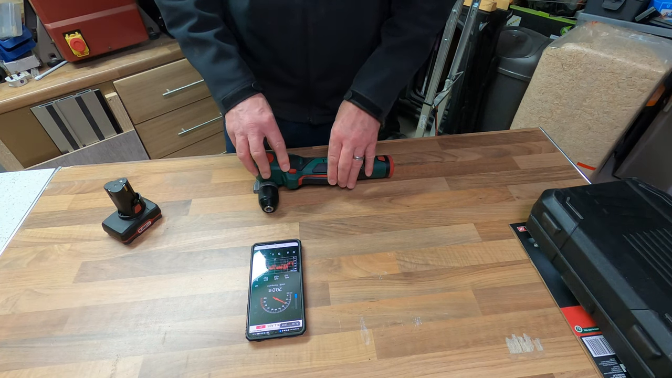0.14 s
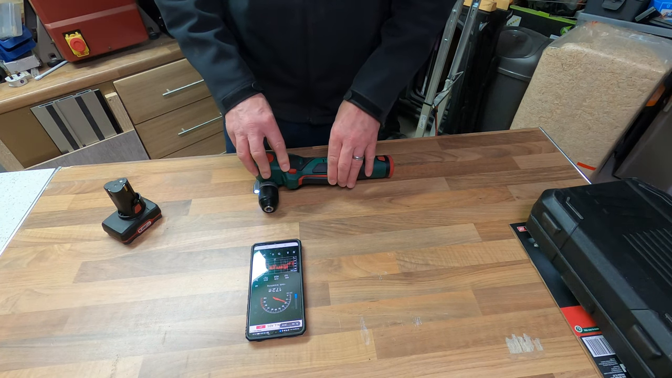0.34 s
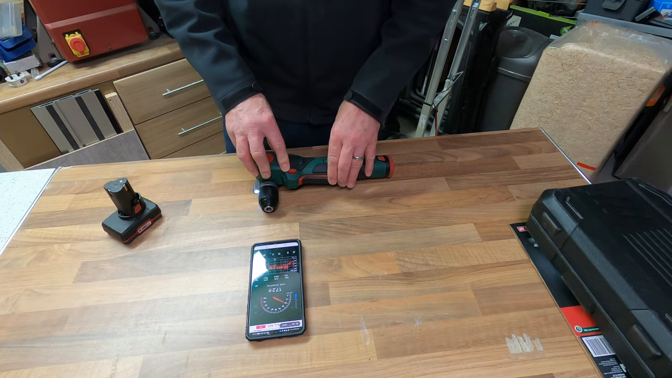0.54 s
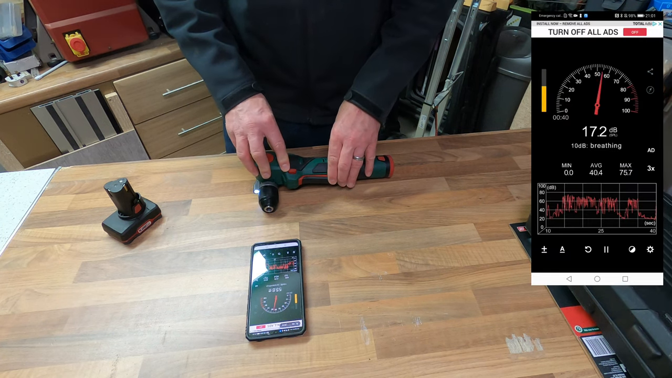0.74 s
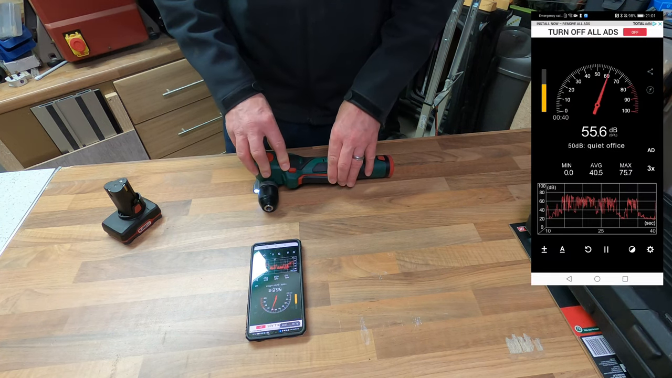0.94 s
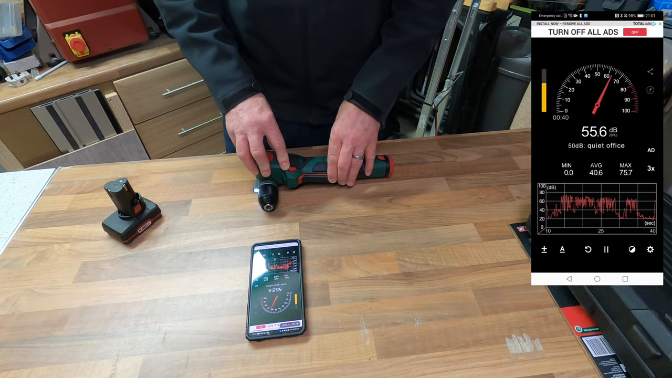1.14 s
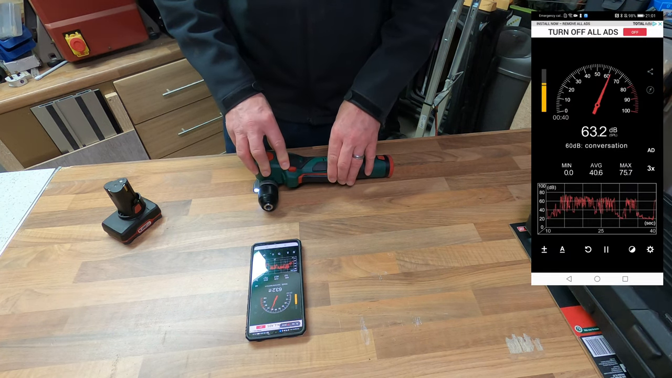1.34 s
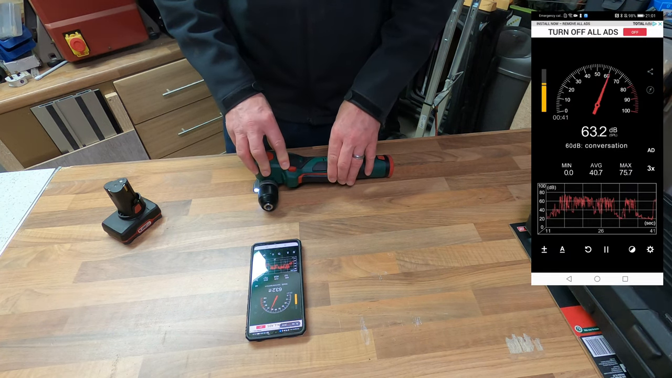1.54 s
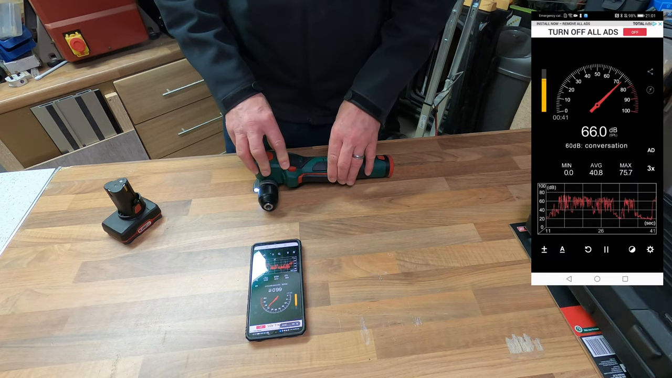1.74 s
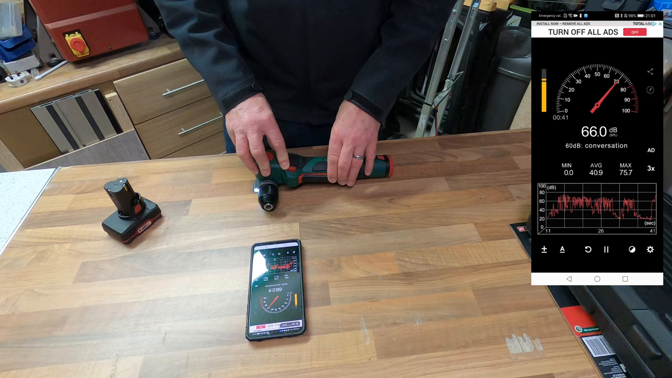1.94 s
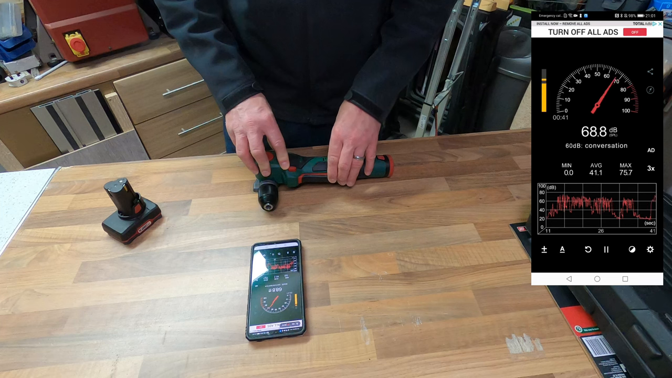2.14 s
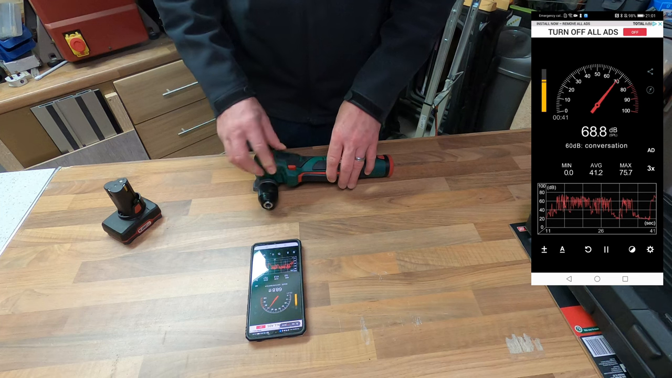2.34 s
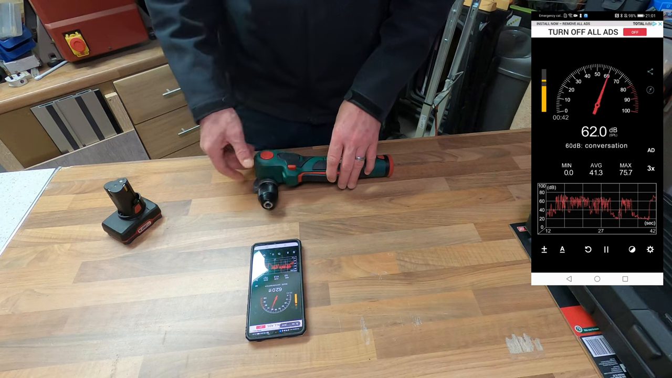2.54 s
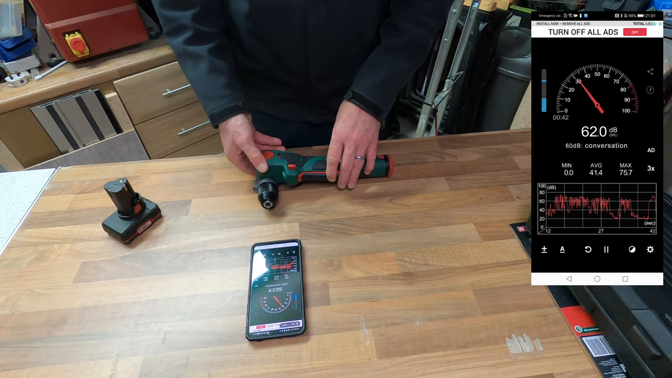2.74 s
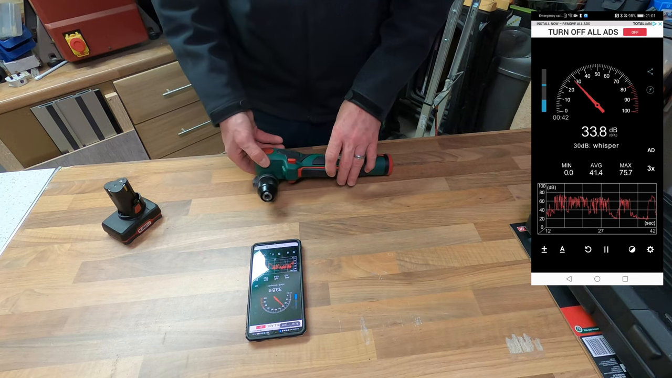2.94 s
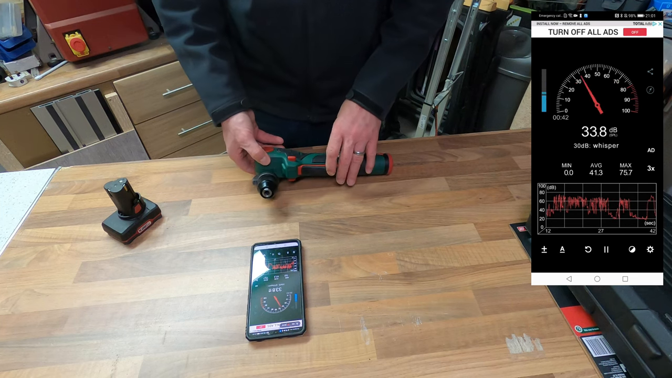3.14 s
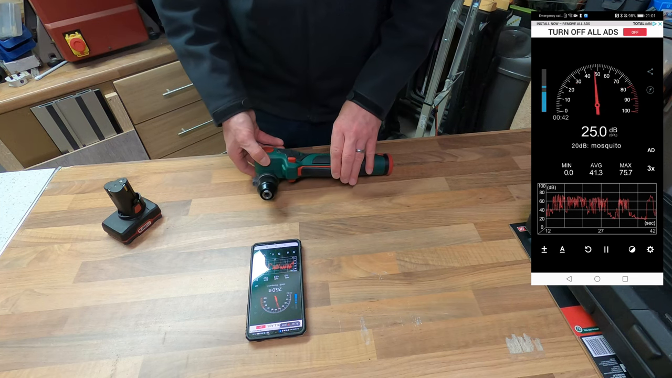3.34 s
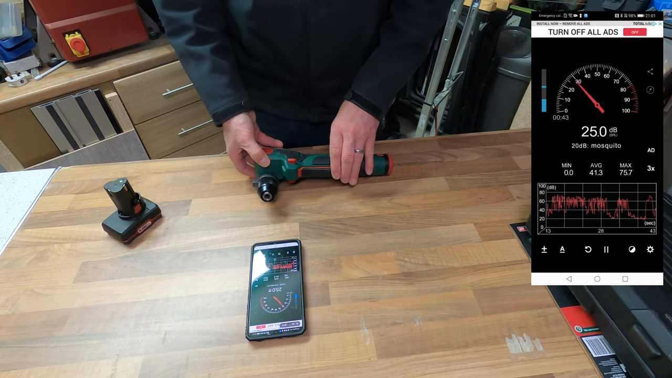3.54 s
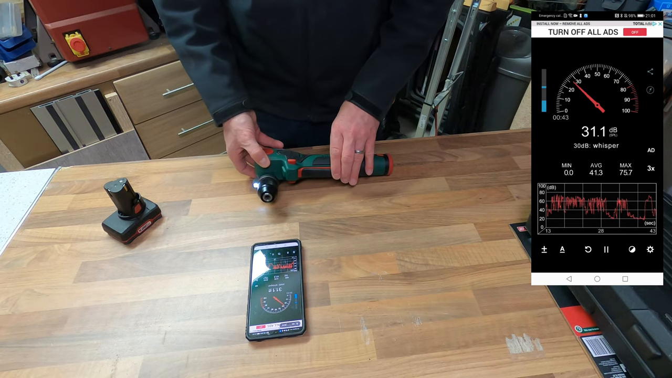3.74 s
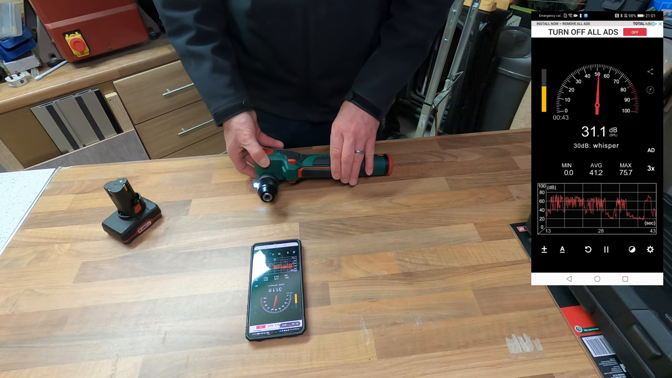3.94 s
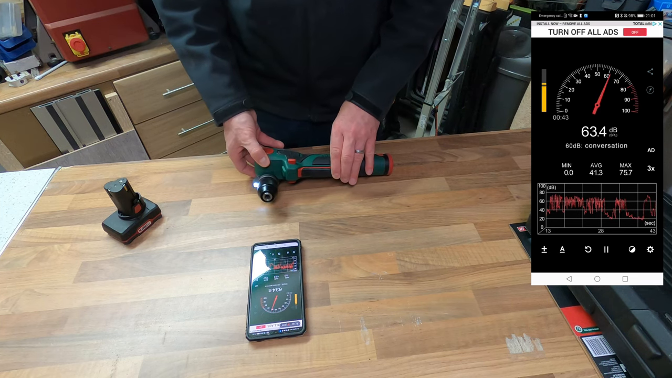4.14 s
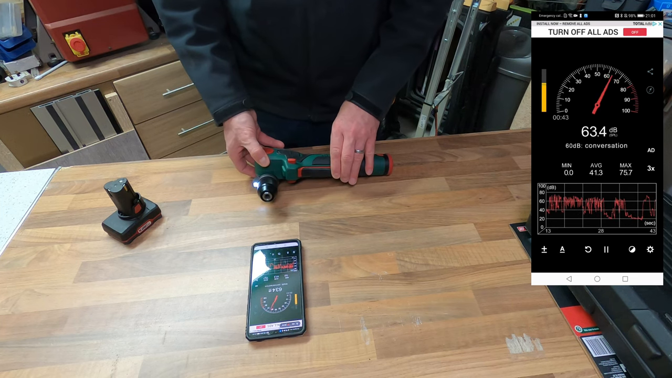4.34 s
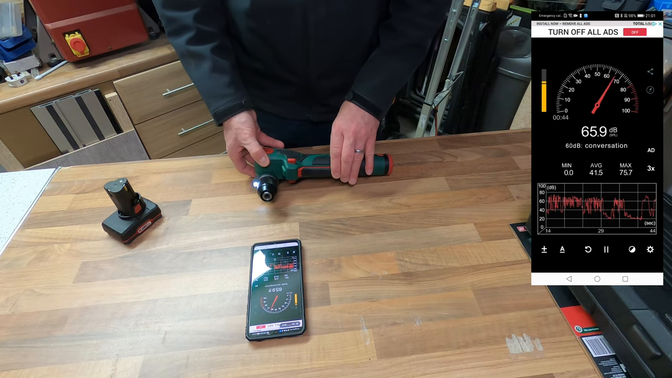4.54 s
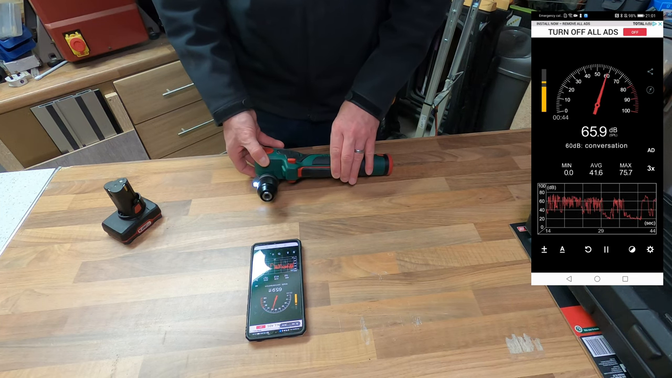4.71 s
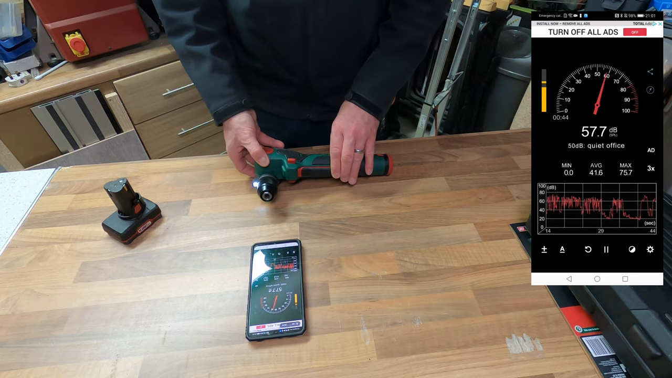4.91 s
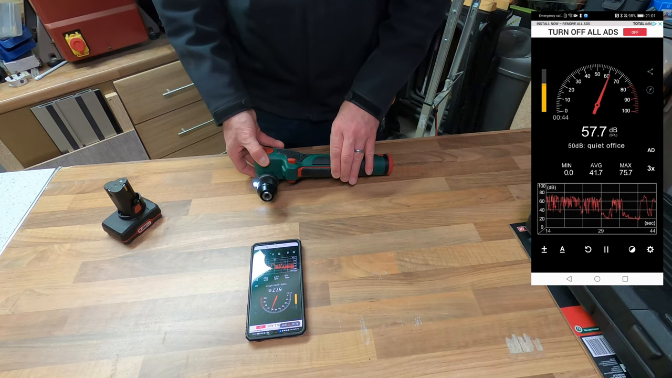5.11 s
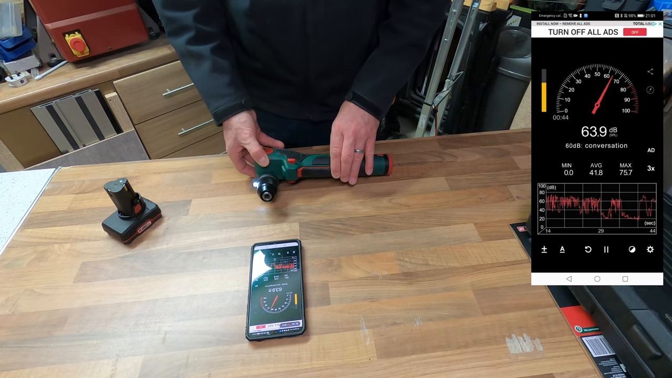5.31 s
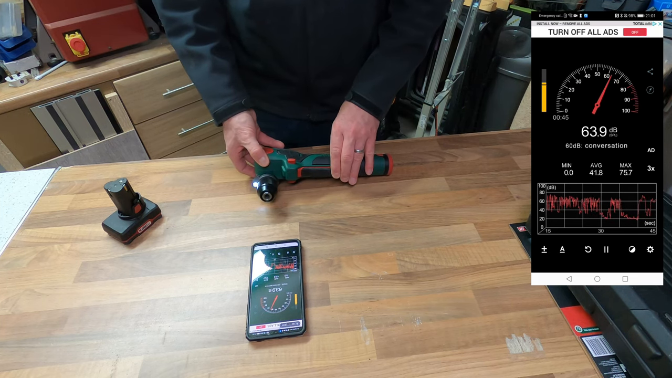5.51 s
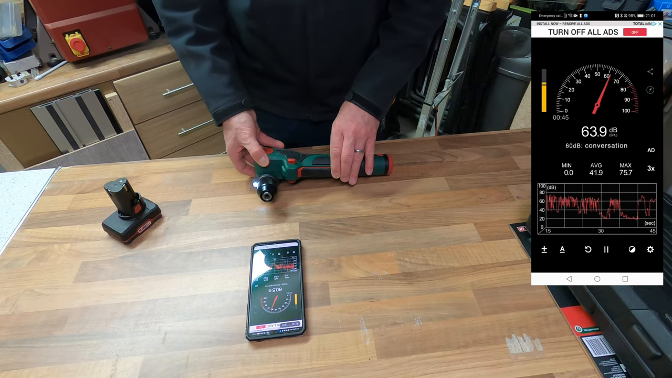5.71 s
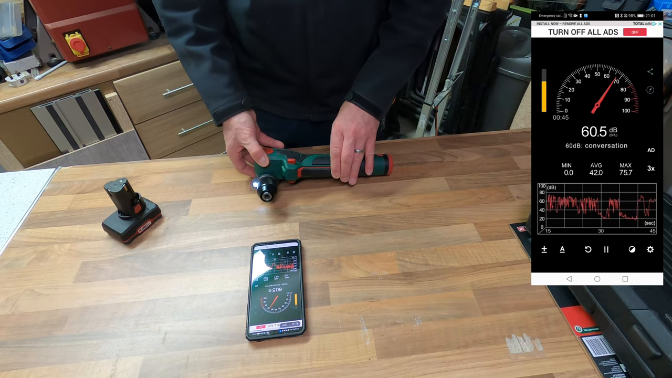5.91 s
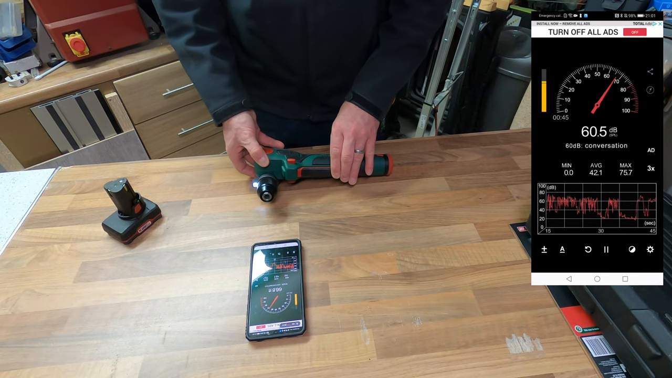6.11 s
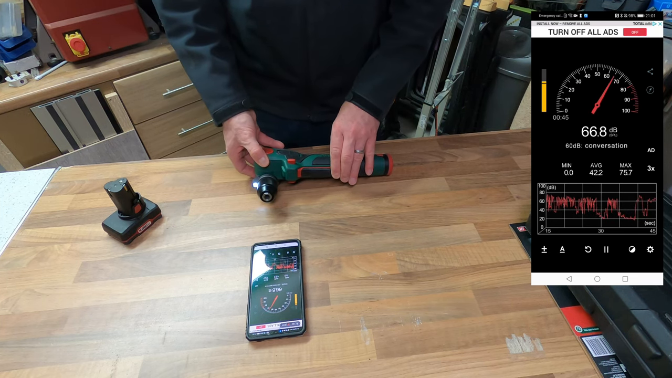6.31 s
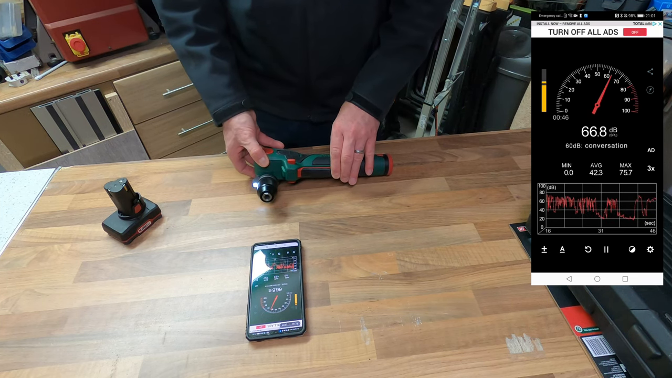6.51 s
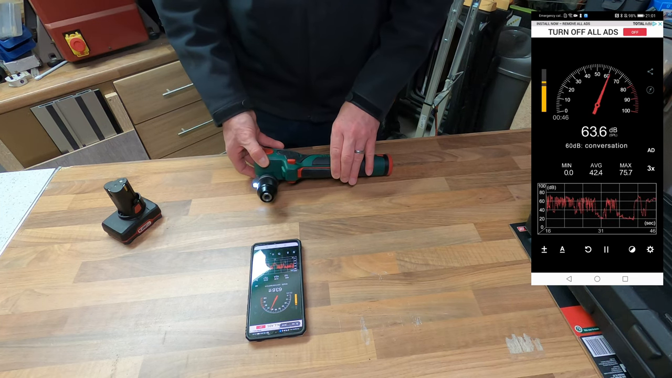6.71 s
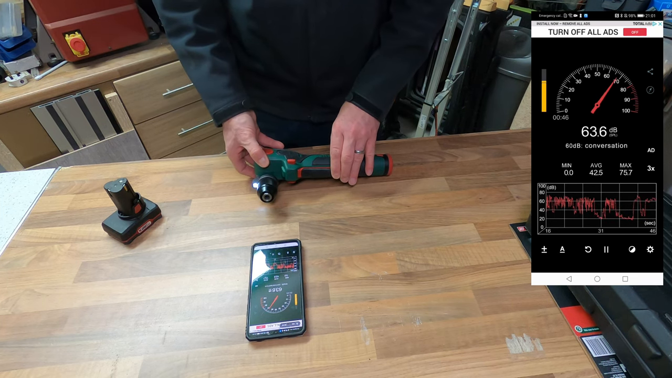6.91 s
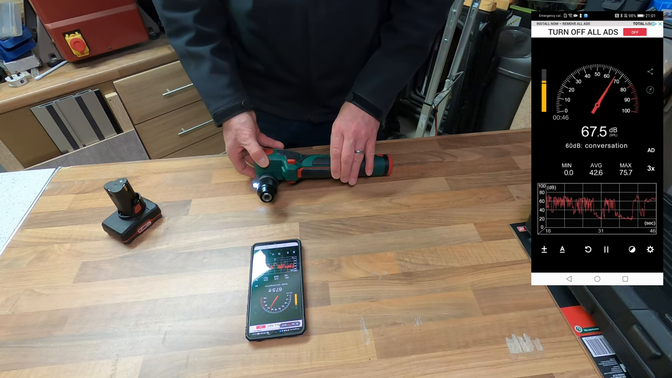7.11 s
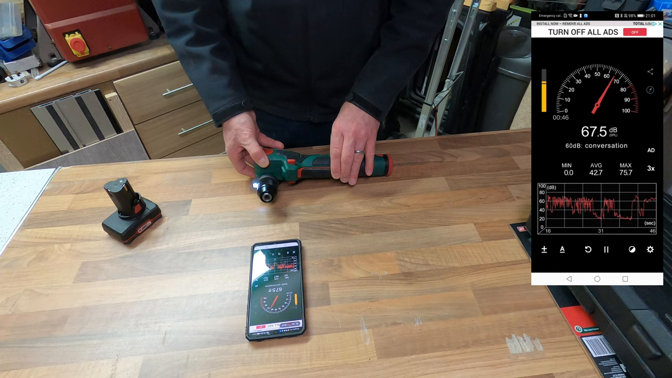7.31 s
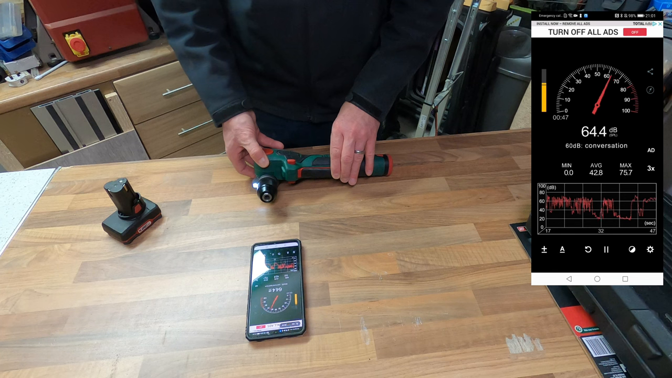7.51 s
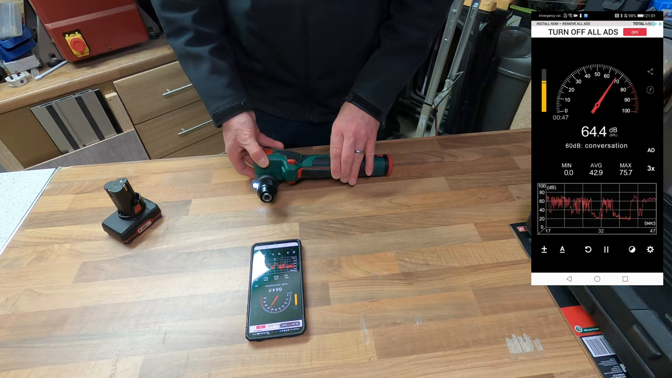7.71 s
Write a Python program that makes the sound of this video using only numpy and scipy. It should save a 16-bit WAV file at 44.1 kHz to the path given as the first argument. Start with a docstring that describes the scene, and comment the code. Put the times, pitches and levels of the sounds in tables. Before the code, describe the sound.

Unloaded right-angle drill on a wooden bench: whistling crawl, brief rev and brake, grip thumps, then a fast spin-up to bright, rasping full speed.

```python
"""A faint workshop murmur and a small knock come first, then a cordless angle drill runs unloaded on a wooden bench:
one short burst, a few thumps and rubs as the hand shifts its grip, then a wind-up to full speed.
One shaft speed drives it all: the motor sings on multiples of it, the gears turn noise into rattle,
and the bench booms as low tones sweep through its resonances. A speed controller whistles at part trigger."""
import sys
import numpy as np
from scipy import signal
from scipy.fft import rfft, irfft, next_fast_len
from scipy.io import wavfile
from scipy.ndimage import uniform_filter1d

SR = 44100
rng = np.random.default_rng(int(sys.argv[2]) if len(sys.argv) > 2 else 0)


def master_out(mix):
    """Clip the mix to full scale and print it as 16-bit PCM to the path in sys.argv[1]."""
    frames = np.transpose(np.atleast_2d(mix))
    ceiling = np.clip(frames, -1, 1)
    pcm = np.round(ceiling * 32767).astype(np.int16)
    wavfile.write(sys.argv[1], SR, pcm)


N = 342216
TIME = np.arange(N) / SR
SIZE = 2 * next_fast_len((N + SR) // 2)  # leaves room for ringing to die out
FREQS = np.fft.rfftfreq(SIZE, 1 / SR)
CRAWL_TURNS_PER_S = 66  # below about this speed the rotor turns lumpily
CHUCK_ORDER, PLANET_ORDER = .0521, .2607  # turns per turn of the motor shaft


def amp(db):
    """Decibels to gain."""
    return 10 ** (np.asarray(db) / 20)


def unit(x):
    """Scales to rms 1."""
    return x / np.sqrt(np.mean(x ** 2) + 1e-20)


def lookup(points, hz):
    """Reads a two-column table along a logarithmic axis."""
    position, value = np.transpose(points)
    return np.interp(np.log(hz + 1), np.log(position + 1), value)


def shaped(x, gain):
    """Filters by a gain at each frequency."""
    return irfft(rfft(x, SIZE) * gain, SIZE)[..., :N]


def drift(hz):
    """Smooth random wander of rms about 1, mostly slower than hz."""
    coarse = np.linspace(0, TIME[-1], next_fast_len(N // 16))
    gain = 1 / (1 + (np.fft.rfftfreq(len(coarse), coarse[1]) / hz) ** 4)
    wander = irfft(rfft(rng.standard_normal(len(coarse))) * gain, len(coarse))
    return np.interp(TIME, coarse, unit(wander))


# How alike noise is at the two microphones. Each row: frequency in Hz, likeness from 0 to 1.
LIKENESS = [(30, .8), (100, .98), (400, .97), (700, .95), (2500, .9), (12000, .6)]


def noise(db, strength=0.57):
    """Noise of rms 1 times strength, coloured by a relative spectrum in dB, partly alike at the two microphones."""
    like = np.clip(lookup(LIKENESS, FREQS), 0, 1)
    split = np.sqrt(np.array([1 + like, 1 - like]) / 2)
    mid, side = shaped(strength * rng.standard_normal((2, N)), unit(amp(db)) * split)
    return np.array([mid + side, mid - side])


def tone(turns, order, flutter, spread=0.):
    """One multiple of the shaft rotation; it wavers, and reaches the microphones by different paths."""
    waver = 1 + flutter * (drift(12) + 1j * drift(12)) / np.sqrt(2)
    paths = np.exp(1j * spread * np.array([[1], [-1]]) * drift(0.74))
    rotation = np.exp(2j * np.pi * (order * turns + rng.random()))
    return np.sqrt(2) * (paths * waver * rotation).real


def blow(s, rise, decay):
    """Envelope that swells exponentially up to a moment and dies away exponentially after it."""
    return np.exp(-np.maximum((s - TIME) / rise, (TIME - s) / decay).clip(0, 60))


# Workshop background colour. Each row: frequency in Hz, relative density in dB per Hz.
AIR = [(25, -3), (50, -10), (90, -34.5), (160, 2.5), (300, -11.5), (550, -18), (1200, -16), (8000, -33.5),
       (15000, -47)]
AIR_DB = -62.5  # gain on the noise


def air():
    """The workshop background is steady noise, heaviest in the low tones."""
    return amp(AIR_DB) * noise(lookup(AIR, FREQS))


def workshop(x, wet_db=-10, t60=0.13, apart=0.53):
    """A short scatter of reflections from bench, cupboards and walls, partly the same at both microphones."""
    sparse = rng.standard_normal((3, N)) * (rng.random((3, N)) < 2500 / SR)  # 2500 a second on average
    taps = sparse * amp(-60 * TIME / t60) * (TIME > .002)
    taps = taps[0] + apart * taps[1:]  # one shared scatter plus one for each side
    soak = FREQS ** 2 / (FREQS ** 2 + 500 ** 2)  # clutter soaks up the low reflections
    return x + amp(wet_db) * shaped(x, soak * rfft(taps / np.linalg.norm(taps[0]), SIZE))


# Sharp resonances of bench and tool. Each row: frequency in Hz, gain at the peak in dB.
RINGS = [(190, 5.5), (245, 6.5), (295, 2.5), (405, 7), (905, 8.5)]
RING_WIDTH = 0.042  # share of each frequency


def ringing(x):
    """Sharp resonances of bench and tool store what passes and ring on, beating against tones that glide away."""
    boost = sum((amp(db) - 1) / (1 + 2j * (FREQS / hz - 1) / RING_WIDTH) for hz, db in RINGS)
    return shaped(x, 1 + boost)


# How the bench top radiates. Each row: frequency in Hz, relative level in dB.
BENCH = [(30, -39), (70, -24), (100, -14.5), (135, -4.5), (190, -2), (300, 2), (410, -4.5), (500, -8.5),
         (700, -16.5), (1500, -29), (5000, -66)]
# Gear case colour at part speed. Each row: frequency in Hz, relative density in dB per Hz.
CASE_SLOW = [(320, -20), (550, -9.5), (705, -10), (880, -11.5), (1130, -9.5), (1520, -4), (2200, -8.5),
             (2700, -5.5), (3100, -8), (3610, -1), (4440, -12), (6100, -15.5), (7510, -27), (8870, -22.5),
             (15000, -47)]
# The tool thuds on the bench. Each row: peak in seconds, relative level in dB, decay to 1/e in seconds.
THUDS = [(.333, -53, 0.017), (2.456, -29, 0.018), (2.53, -43, 0.095), (2.69, -49.5, 0.032),
         (2.745, -52, 0.01), (3.035, -55, 0.03), (3.213, -34.5, 0.037), (3.375, -56, 0.072),
         (3.831, -30, 0.012)]
# Slack gears and plastic click in the housing. Each row: peak in seconds, relative level in dB.
CLICKS = [(0.334, -53.5), (.545, -40), (.555, -37), (.564, -36.5), (.588, -37), (2.513, -38), (3.745, -51),
          (3.777, -49), (3.802, -37), (3.83, -31)]
# Soft noise swells: hand and sleeve rubs, and the short dull body of the first knock and the trigger click.
# Each row: centre in seconds, half length in seconds, relative level in dB, lower edge in Hz, upper edge in Hz.
SOFT_SWELLS = [(0.852, 0.068, -35.5, 400, 1820), (2.563, 0.15, -56.5, 600, 4200),
               (2.85, 0.088, -57, 1500, 3800), (3.222, 0.045, -62, 500, 2500),
               (3.803, 0.018, -49, 750, 950), (0.335, 0.008, -55, 400, 1300)]
THUD_RISE_SHARE, CLICK_RISE_S, CLICK_DECAY_S = 0.4, 0.00061, 0.0023


def thuds():
    """Each thud is a swell of noise coloured by the bench top, which then rings on."""
    envelope = sum(amp(db) * blow(s, THUD_RISE_SHARE * decay, decay) for s, db, decay in THUDS)
    # the rubber grip takes the edge off each blow
    soft_db = -20 * np.log10(1 + (FREQS / 310) ** 6 + (155 / (FREQS + 1)) ** 4)
    return ringing(envelope * noise(lookup(BENCH, FREQS) + soft_db))


def handling():
    """Thuds and clicks are sharp bursts of noise; rubs and the dull bodies of two knocks are rounded swells."""
    click = sum(amp(db) * blow(s, CLICK_RISE_S, CLICK_DECAY_S) for s, db in CLICKS)
    blunt_db = -20 * np.log10(1 + (FREQS / 7200) ** 4)  # skin, cloth and plastic make little top treble
    swells = np.zeros((2, N))
    for s, half, db, low_hz, high_hz in SOFT_SWELLS:
        colour = -10 * np.log10((1 + (FREQS / high_hz) ** 4) * (1 + (low_hz / (FREQS + 1)) ** 3))
        swells += amp(db) * np.exp(-((TIME - s) / half) ** 2) * noise(colour + blunt_db)
    return swells + thuds() + click * noise(lookup(CASE_SLOW, FREQS) + blunt_db)


# Moves of the trigger; an aim below zero is the brake dragging the rotor to a halt.
# Each row: start in seconds, speed aimed at in turns a second, settling time in seconds.
TRIGGER = [(.508, 20.8, .128), (.9, 25.3, .085), (1.272, 28, .1), (1.338, 90, .125), (1.44, 138.4, .094),
           (1.6, 154.7, .2), (2.12, 120, .2), (2.168, -145, .6), (2.48, 0, .02), (3.799, 22, .09),
           (3.875, 31.3, .115), (4.25, 85, .125), (4.345, 205.5, .101), (4.547, 223, .175),
           (4.885, 250, .12), (4.945, 358.4, .057), (6.05, 360.9, .2)]


def shaft():
    """Turns a second: after each move of the trigger the rotor closes in exponentially on its new speed."""
    speed = np.zeros(N)
    for s, aim, settle in TRIGGER:
        at = round(s * SR)
        approach = np.exp(-TIME[:N - at] / settle)
        speed[at:] = np.maximum(aim + (speed[at] - aim) * approach, 0)
    return speed


# Bench resonances under the rotor's pull. Each row: frequency in Hz, width in Hz, peak level in dB.
BOOMS = [(197, 69, -29), (308.7, 79, -23), (433.6, 101, -26)]


def rotor_pull(speed, turns):
    """The three-a-turn pull of the rotor booms as its pitch sweeps through broad bench resonances."""
    pull_hz = 3 * speed
    boom = sum(amp(db) / (1 + (2 * (pull_hz - hz) / width) ** 4) for hz, width, db in BOOMS)
    return boom * tone(turns, order=3, flutter=.12)


# Cogging pulses at a crawl. Each row: multiple of the shaft speed, level in dB before the bench colour.
COGGING = [(4, -52), (8, -44), (12, -34), (16, -43.5), (20, -37), (24, -59), (28, -43)]


def cogging(speed, turns):
    """The rotor pulses on multiples of its speed; inertia smooths this away as it speeds up."""
    crawl = 1 / (1 + (speed / CRAWL_TURNS_PER_S) ** 8)
    pulses = 0
    for order, db in COGGING:
        pulses = pulses + amp(db + lookup(BENCH, order * speed)) * np.sin(2 * np.pi * order * turns)
    return np.sqrt(2) * crawl * pulses * (1 + .15 * drift(30))


# Rumble that the gears shake into the bench. Each row: shaft turns a second, relative level in dB.
THRUM = [(8, -34.5), (16, -38), (28, -41.5), (50, -31.5), (150, -39.5), (210, -38.5), (360, -36)]
BENCH_COAST_DB_PER_S = -3  # a coasting rotor shakes the bench less and less


def bench(speed, turns, running, coast_s, lumpy_db=2.0):
    """The bench top sounds the rotor's pull, the cogging pulses and the lumpy shake of the gears, and rings on."""
    thrum_db = lookup(THRUM, speed) + lumpy_db * drift(4.2)
    thrum = noise(lookup(BENCH, FREQS), running * amp(thrum_db))
    shake = amp(BENCH_COAST_DB_PER_S * coast_s) * (running * cogging(speed, turns) + thrum)
    return ringing(running * rotor_pull(speed, turns) + shake)


# Controller steps. Each row: start in seconds, end in seconds, switching frequency in Hz, relative level in dB.
CHOPPER = [(0.508, 0.538, 5430, -63), (0.534, .915, 5430, -51), (0.914, 1.28, 5790, -50.5),
           (1.272, 1.34, 6600, -50), (1.328, 1.44, 5830, -51), (1.44, 1.47, 6680, -47.5),
           (1.47, 2.13, 5610, -51), (3.806, 3.887, 5430, -49.5), (3.886, 4.332, 5830, -54),
           (4.25, 4.269, 6650, -44), (4.319, 4.351, 6700, -41.5), (4.374, 4.406, 6800, -44)]
MIRROR_HZ = 12000  # treble is faintly imaged about this frequency, which is no doing of the controller


def controller(turns, octave_db=-17, mirror_db=-28):
    """The windings whistle at the switching rate, which steps with the trigger; the commutator chops the tone.
    Lower steps carry an octave; a faint image of it, not made by the drill, lies on the far side of MIRROR_HZ."""
    whistle = np.zeros(N)
    for start, end, hz, db in CHOPPER:
        gate = np.clip(np.minimum(TIME - start, end - TIME) / 0.0022, 0, 1)
        phase = 2 * np.pi * hz * TIME
        octave = amp(octave_db) * np.sin(2 * phase)
        image = amp(mirror_db) * np.sin(2 * (2 * np.pi * MIRROR_HZ * TIME - phase))
        whistle += gate * amp(db) * (np.sin(phase) + (2 * hz < MIRROR_HZ) * (octave + image))
    chop = np.cos(2 * np.pi * 4 * turns)
    return np.sqrt(2) * whistle * (1 + .7 * chop + .1 * drift(120))


SIDEBANDS_DB = -36  # at full speed


def planets(speed, turns):
    """Circling planet gears chop multiples of the shaft speed into wavering side tones, weaker toward the top."""
    teeth = sum(tone(turns, k, flutter=1) / np.sqrt(k) for k in range(3, 11))
    passing = sum(np.cos(2 * np.pi * (k * PLANET_ORDER * turns + rng.random())) for k in range(1, 6))
    return amp(SIDEBANDS_DB) * (speed / speed.max()) ** 3 * unit(teeth * passing)


STACK_DB = -15.5  # relative to the rattle


def stack(speed, turns):
    """Meshing teeth sing on multiples 4 to 33 of the shaft speed, coloured by the gear case."""
    case = amp(STACK_DB + lookup(CASE_SLOW, np.arange(SR)))  # one gain for each whole Hz
    tones = 0
    for k in range(4, 34):
        tones = tones + case[(k * speed).astype(int)] * np.cos(2 * np.pi * (k * turns + rng.random()))
    return np.sqrt(2) * tones


# Modes of the gear housing. Each row: frequency in Hz, relative level in dB.
HOUSING = [(1580, -8), (2700, -2), (3600, 0)]
HOUSING_Q, STRIKES_PER_TURN = 18, 5
KNOCK_DB = -1.5  # gain on the knocks within the strikes


def strikes(speed, knocks):
    """Teeth hit and ring the housing modes: with the given knocks at a crawl, at random as the gears speed up."""
    chance = STRIKES_PER_TURN * (speed + 1) / SR
    hits = (rng.random(N) < chance) / np.sqrt(chance) * speed / (speed + CRAWL_TURNS_PER_S / 2)
    age = TIME[:1024]
    modes = 0
    for hz, db in HOUSING:
        modes = modes + amp(db) * np.exp(-np.pi * hz * age / HOUSING_Q) * np.sin(2 * np.pi * hz * age)
    modes = modes * (1 - np.exp(-(age / 0.0004) ** 2))  # grease softens each blow
    force = hits * (rng.uniform(-1, 1, N) + .4 * rng.uniform(-1, 1, (2, N)))
    force = force + amp(KNOCK_DB) * knocks * rng.choice([-1, 1], N)
    return signal.oaconvolve(force, modes[None] / np.linalg.norm(modes), axes=1)[:, :N]


# Gear rattle against speed. Each row: shaft turns a second, relative level in dB.
RATTLE = [(14, -36.5), (27, -38), (60, -34.5), (110, -30), (150, -30.5), (180, -34), (225, -32),
          (360, -28.5)]
# Gear case colour at full speed. Each row: frequency in Hz, relative density in dB per Hz.
CASE_FAST = [(320, -53.5), (550, -8.5), (1050, -2.5), (1300, -10), (1410, -4), (2050, -9), (3500, -4.5),
             (4300, -7.5), (4600, -12.5), (5700, -15), (6630, -12.5), (7510, -22), (8870, -15), (9910, -25),
             (12200, -26.5), (15000, -47)]
COAST_DB_PER_S = -12  # with the trigger released the teeth are unloaded and the rattle dies away
RECOIL_SHARE, STRIKE_DB = .5, -8  # force of every second knock; strikes relative to the rattle


def gears(speed, turns, running, coast_s, grain=0.054, uneven=0.3):
    """Teeth clatter in the housing: ticks at a crawl, a dense, brighter rasp that throbs with the chuck when fast."""
    carrier = 1 + .13 * np.cos(4 * np.pi * PLANET_ORDER * turns) + .07 * np.cos(2 * np.pi * CHUCK_ORDER * turns)
    # four times a turn the torque dips, knocking the slack out of the train and back
    flanks, flank_hz = 8 * turns, 8 * speed + 1e-6
    since_s = (flanks % 1) / flank_hz
    flank = flanks.astype(int)
    force = (1 + uneven * rng.uniform(-1, 1, N))[flank] * np.where(flank % 2, RECOIL_SHARE, 1)
    ticks = force * np.exp(-since_s / .0015)
    loose = .55 / (1 + (speed / 60) ** 2)  # slack tells less as the speed rises
    strength = running * amp(lookup(RATTLE, speed) + COAST_DB_PER_S * coast_s) * carrier
    rough = unit(np.exp(grain * (drift(450) + drift(50))))
    clatter = strength * (1 - loose + 2 * loose * ticks) * rough
    knocks = loose * force * np.diff(flank, prepend=0) * np.sqrt(SR / (flank_hz + 1))
    # crossfade from the dull to the bright colour between 130 and 260 turns a second
    fast = np.clip((speed - 130) / 130, 0, 1)
    dull = ringing(noise(lookup(CASE_SLOW, FREQS), amp(-4.5) * np.sqrt(1 - fast) * clatter))
    bright = noise(lookup(CASE_FAST, FREQS), amp(1.4) * np.sqrt(fast) * clatter)
    struck = amp(STRIKE_DB) * strikes(speed, knocks) + np.sqrt(1 - fast) * stack(speed, turns)
    return dull + bright + strength * struck


# Swells of the once-a-turn hum. Each entry: start in seconds.
SWELLS = [4.95, 5.681, 6.631, 7.42]
HUM_DB, SWELL_S, SAG_DB_PER_S = -24.5, 0.06, 12


def swelling():
    """Gain of the hum: each swell lifts it quickly, and it sags until the next."""
    age = np.zeros(N)
    for s in SWELLS:
        age = np.where(TIME < s + SWELL_S / 2, age, TIME - s - SWELL_S / 2)
    smooth_age = uniform_filter1d(age, max(round(SWELL_S * SR), 1))
    return amp(HUM_DB - SAG_DB_PER_S * smooth_age)


# Motor and gear tones. Each row: multiple of the shaft speed, level at full speed in dB.
WHINE = [(.276, -58), (.523, -45), (.684, -36), (.893, -40), (2, -49), (3, -39), (6, -47.5), (7, -50),
         (15, -41.5), (17, -51), (18, -50), (24, -49), (30, -55), (33, -56), (36.8, -63)]
# Tones that stand out at part trigger. Each row: multiple of the shaft speed, peak level in dB,
# strongest speed in turns a second, width as a share of that speed.
MESH = [(.523, -43, 190, .25), (1, -37, 195, .3), (3, -42, 198, .2), (6, -44, 165, .45),
        (9, -42.5, 125, .45), (10.27, -45.5, 160, .35), (12, -41, 213, .15), (31, -53, 216, .05),
        (42.1, -48, 143, .07)]


def motor(speed, turns, running):
    """Unbalance, gear and commutator tones: most grow with speed, some peak at part trigger."""
    share = speed / speed.max()
    out = swelling() * share ** 4 * tone(turns, order=1, flutter=.1)
    for order, db in WHINE:
        out += amp(db) * share ** 4 * tone(turns, order, flutter=.1, spread=.4 * (order > 1))
    for order, db, best, width in MESH:
        peak = np.exp(-(np.log((speed + 1e-3) / best) / width) ** 2)
        out += amp(db) * peak * tone(turns, order, flutter=0.22, spread=.3 * (order > 1))
    return out * running


SLACK_TURNS_PER_S, ENGAGED_TURNS_PER_S = 3.2, 23  # the gears take up their slack between these speeds
WANDER_TURNS_PER_S = .18  # rms, once the gears are engaged


def scene():
    """One shaft speed drives every part of the drill; it wanders a little, which tells most at a crawl."""
    smooth = shaft()
    # time spent slowing down so far, zero whenever the speed is not falling
    coast_s = TIME - np.maximum.accumulate(np.where(np.gradient(smooth) < 0, 0, TIME))
    running = np.clip((smooth - SLACK_TURNS_PER_S) / (ENGAGED_TURNS_PER_S - SLACK_TURNS_PER_S), 0, 1)
    speed = smooth + WANDER_TURNS_PER_S * running * drift(7.2)
    turns = np.cumsum(speed) / SR
    tones = motor(speed, turns, running) + bench(speed, turns, running, coast_s) + controller(turns)
    clatter = gears(speed, turns, running, coast_s) + planets(speed, turns) + handling()
    return air() + tones + workshop(clatter)


# Colour difference between the two microphones. Each row: frequency in Hz, left minus right in dB.
SIDES = [(130, 1.7), (290, 1.7), (360, -1.2), (420, 1.7), (1400, .6), (3100, 2.9), (6800, 2.5), (15000, -6)]
CUTOFF_HZ = 15150


def record(dry, lag_s=.000022):
    """The left microphone hears everything slightly later and with its own colour; then the band limit."""
    sides = np.array([[.5], [-.5]])
    ports = amp(sides * lookup(SIDES, FREQS)) * np.exp(-2j * np.pi * FREQS * sides * lag_s)
    lowpass = signal.firwin(511, CUTOFF_HZ, window=("kaiser", 9), fs=SR)
    return signal.oaconvolve(shaped(dry, ports), lowpass[None], "same")


dry = scene()
out = record(dry)
master_out(out)
```